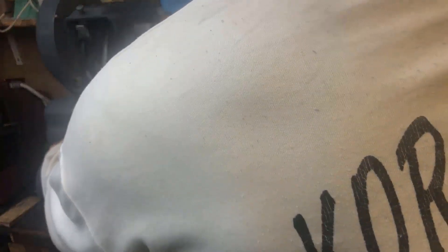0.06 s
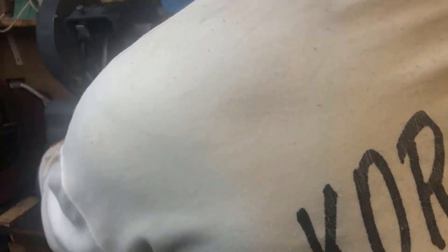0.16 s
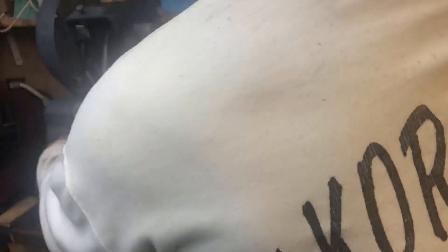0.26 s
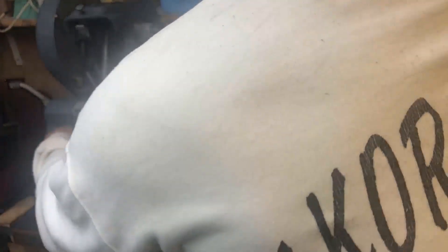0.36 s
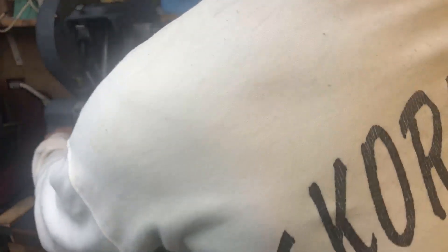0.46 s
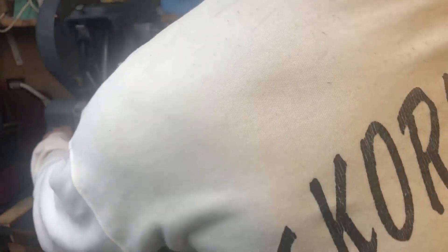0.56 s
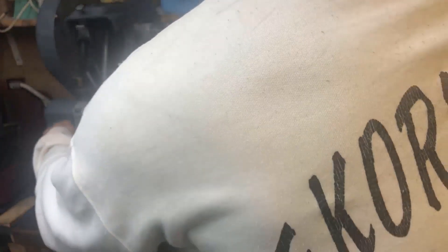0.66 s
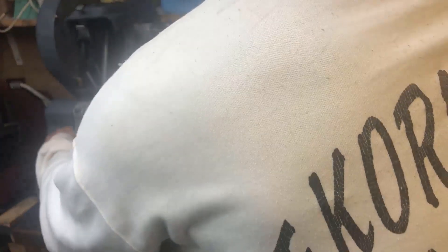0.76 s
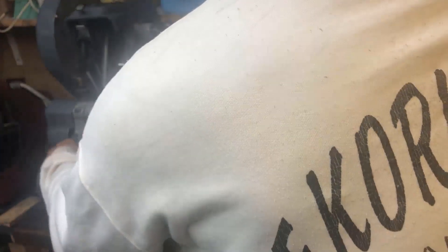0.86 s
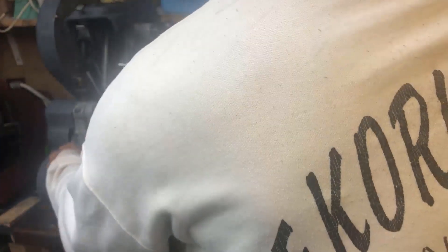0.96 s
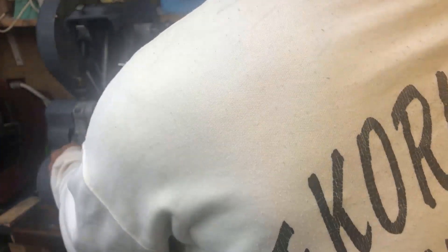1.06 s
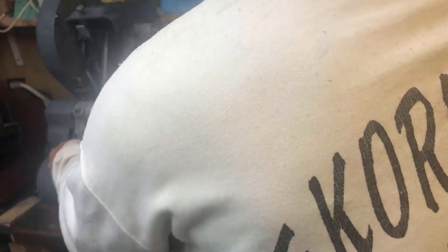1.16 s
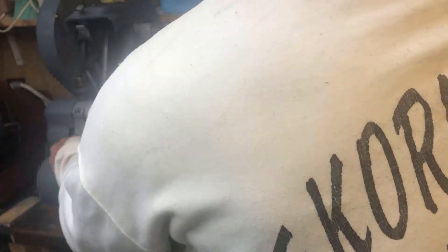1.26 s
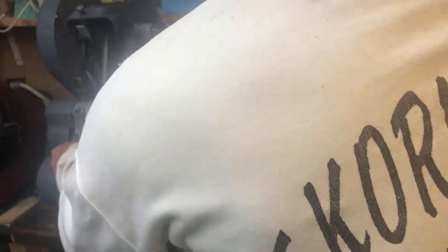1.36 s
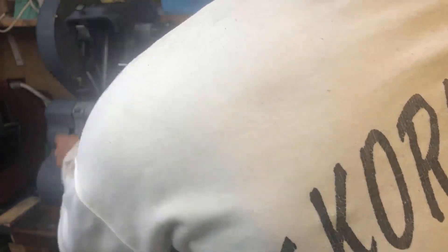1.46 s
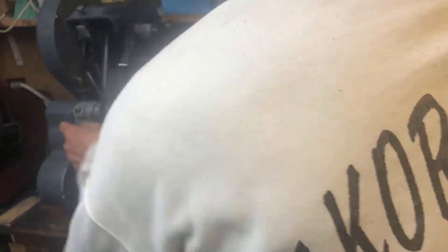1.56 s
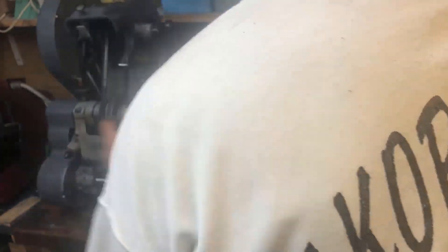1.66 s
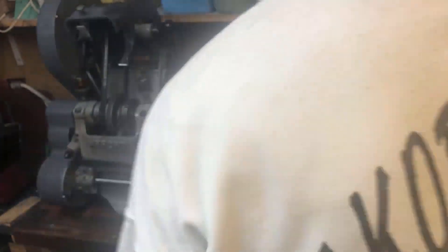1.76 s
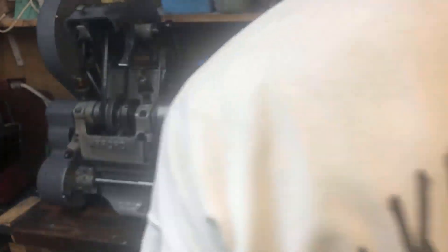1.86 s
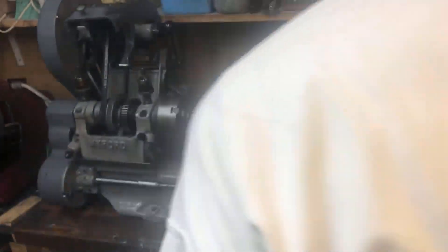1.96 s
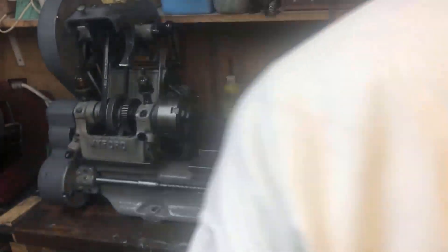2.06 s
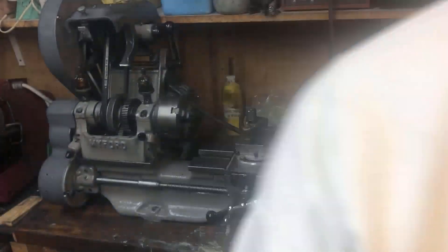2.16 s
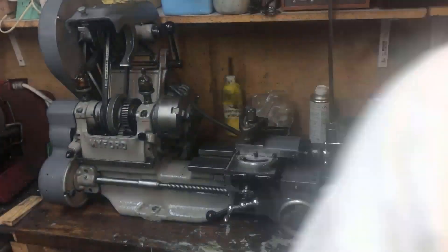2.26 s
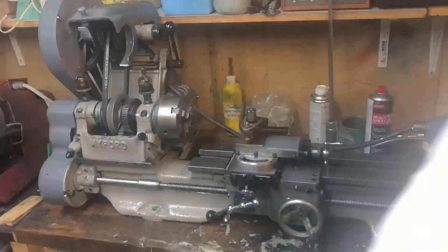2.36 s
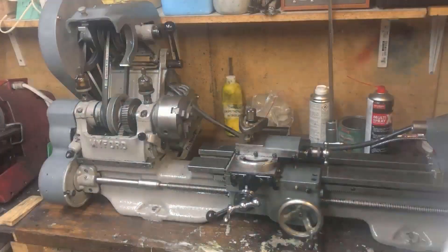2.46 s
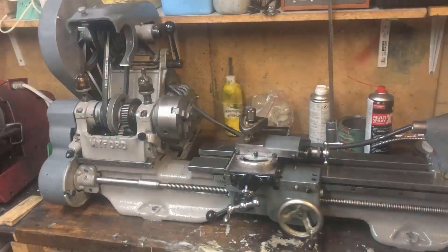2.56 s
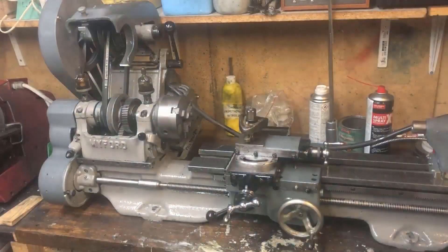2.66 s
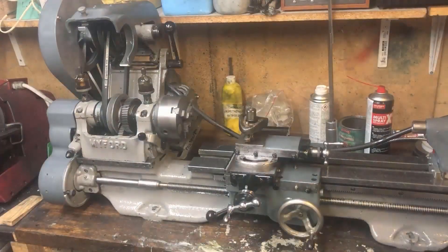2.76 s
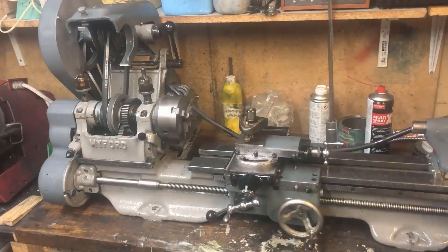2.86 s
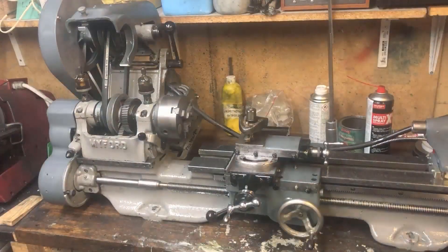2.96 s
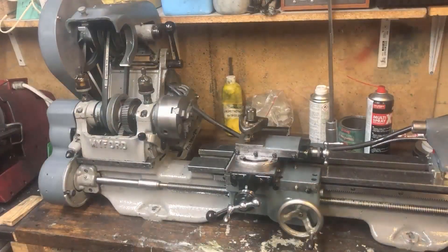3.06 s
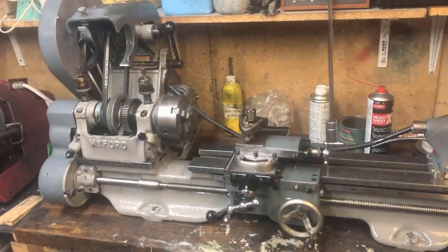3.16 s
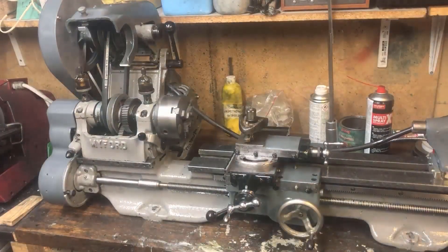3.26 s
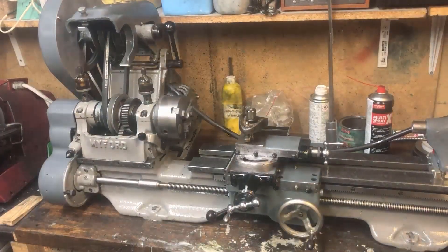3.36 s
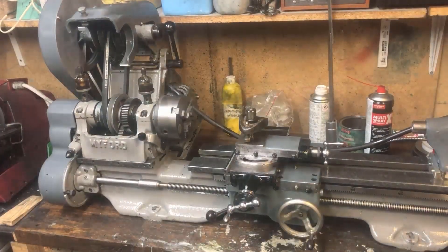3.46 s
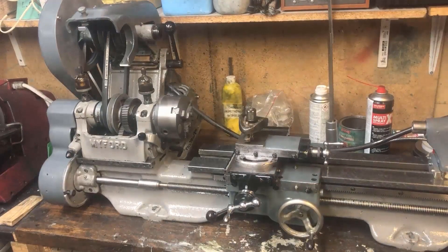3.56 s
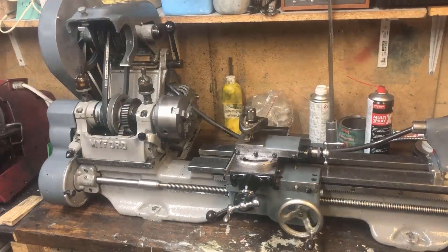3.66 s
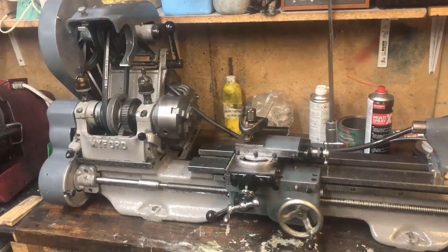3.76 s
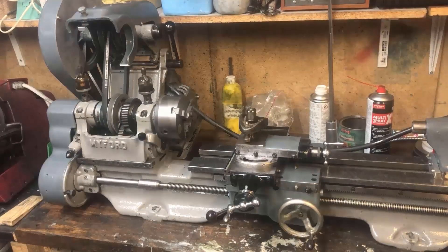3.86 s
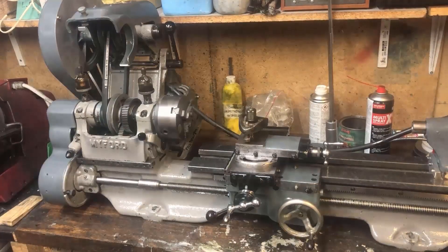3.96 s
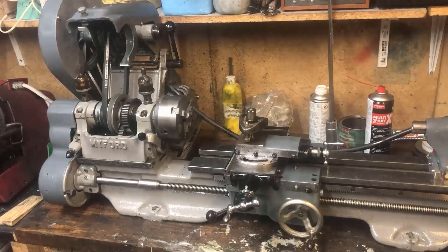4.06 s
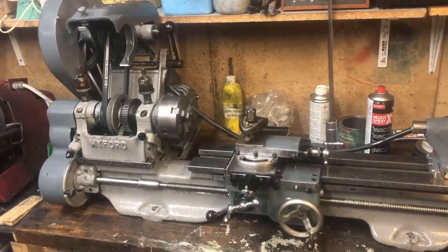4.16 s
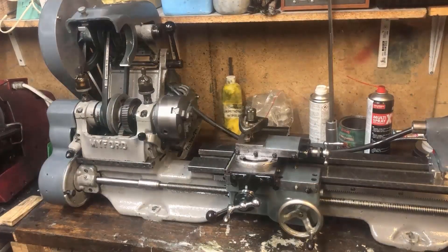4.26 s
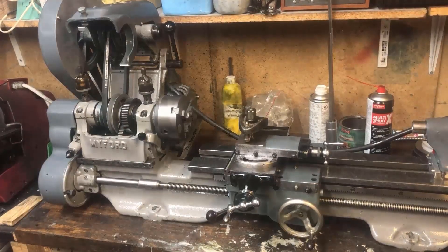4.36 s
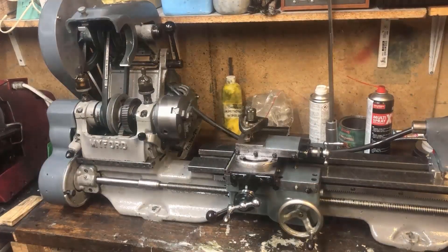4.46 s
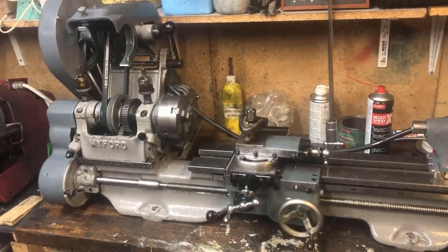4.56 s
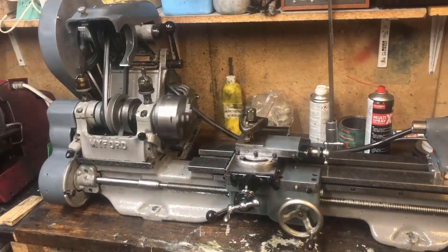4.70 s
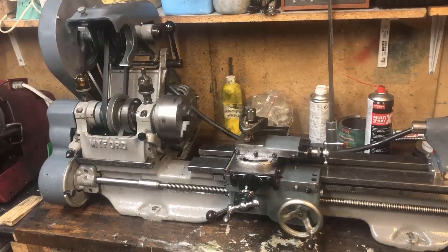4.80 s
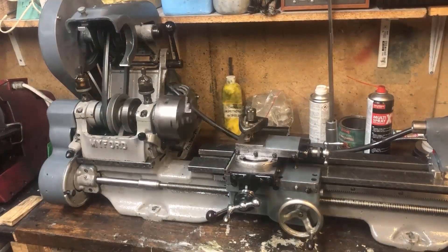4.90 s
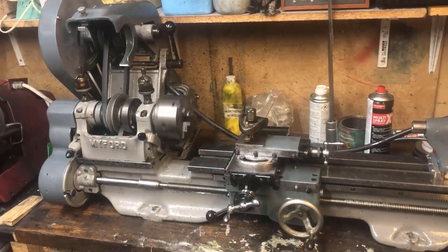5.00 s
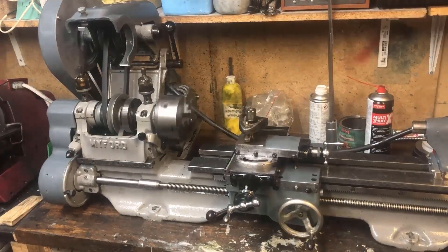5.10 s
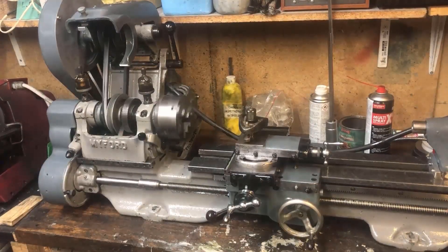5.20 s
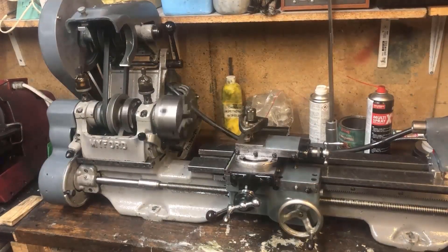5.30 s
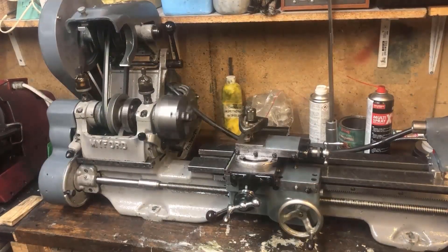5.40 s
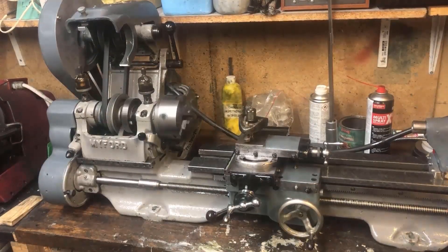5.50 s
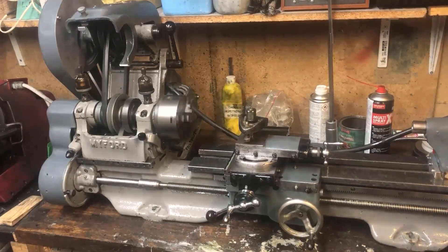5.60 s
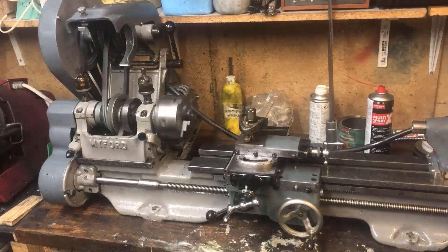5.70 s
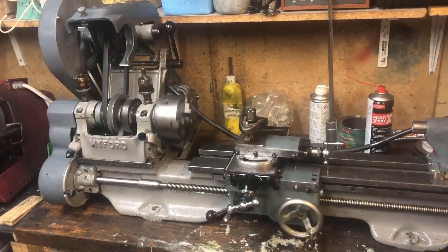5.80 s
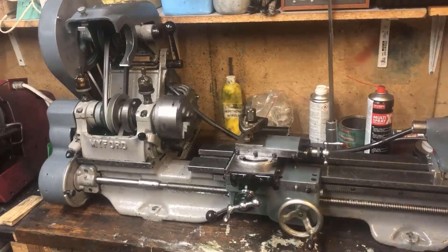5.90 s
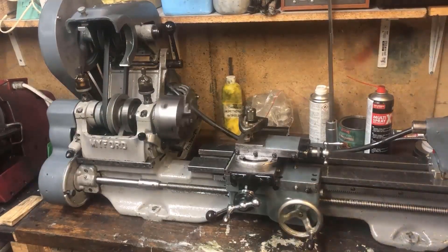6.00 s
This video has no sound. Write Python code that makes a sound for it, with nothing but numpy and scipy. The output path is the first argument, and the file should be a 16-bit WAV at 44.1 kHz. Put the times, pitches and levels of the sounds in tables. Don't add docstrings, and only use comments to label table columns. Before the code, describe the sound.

Quiet handling comes first: dull heel thumps, sharp lever clicks, small metal pings, rustling clothing and soft scuffs. After a modest clunk and a lull, heavier wooden knocks shake the bench and a lathe motor kicks in. Its gears chatter brightly, with regular hard clacks, low rumble and thin bearing hiss. Close phone pickup, short woody room, little deep bass.

```python
import sys
import numpy as np
from scipy import signal
from scipy.fft import rfft, irfft
from scipy.io import wavfile
from scipy.ndimage import uniform_filter1d

SR = 44100
rng = np.random.default_rng(int(sys.argv[2]) if len(sys.argv) > 2 else 0)


def gain_from_db(level_db):
    decades = np.asarray(level_db, float) / 20
    return 10 ** decades


def generate_wav(sig):
    pcm = np.round(np.clip(np.atleast_2d(sig).T, -1, 1) * 32767).astype(np.int16)
    wavfile.write(sys.argv[1], SR, pcm)


N = 266364

# frequency in Hz, level in dB.
MAINS_HUM = [(100, -71.5), (200, -70.5)]
# frequency in Hz, density in dB per Hz.
AIR_COLOUR = [(20, -31), (45, -8.5), (90, 2.5), (160, -6), (300, -3.5), (550, -11.5), (1200, -16),
              (4000, -20), (10000, -22.5), (15800, -24)]
# time in seconds, amount in dB.
MOVEMENT = [(0, -1), (.17, -4), (.5, -11), (.74, -12), (1.5, -10), (1.77, -6.5), (2.17, -3), (2.42, -5),
            (2.96, -4), (3.3, -8.5), (3.7, -11), (4.1, -9.5)]
# level at full movement in dB, slope in dB per dB of movement.
STIR_LAYERS = [
    (-60, .2),
    (-57, 1.01),
    (-58.5, 1.22),
]
CREAK_DB, CREAK_RISE_S, CREAK_T60_S = -29.5, 0.046, 0.55

# start in seconds, length in seconds, level in dB, centre in Hz.
KNELLS = [
    (1.597, 0.049, -49.5, 432),
    (0, 0.28, -69.5, 9600),
    (.25, 0.28, -71.5, 9300),
    (1.651, .05, -67, 4950),
    (2.245, 0.042, -64, 4540),
    (2.814, 0.059, -46, 1450),
    (3.37, 0.063, -70, 3000),
    (4.371, 0.067, -43, 421),
    (4.6, 0.045, -40, 440),
    (4.774, 0.1, -35, 71.4),
]
# start in seconds, length in seconds, level in dB, centre in Hz.
PINGS = [(0.351, 0.072, -70, 955), (1.087, 0.038, -59.5, 1650), (1.144, 0.025, -58, 1600),
         (1.465, 0.04, -59.5, 1560), (1.733, 0.037, -67, 5600), (3.729, 0.067, -66, 3150),
         (.96, 0.09, -53.5, 995), (1.31, 0.085, -52, 990), (2.375, .04, -58, 3000),
         (2.82, 0.037, -51, 1850), (4.196, 0.045, -65, 3240), (4.297, 0.14, -60.5, 3000),
         (4.3, 0.14, -49.5, 883), (4.131, 0.016, -30.5, 905), (4.585, 0.014, -30, 3060),
         (4.743, 0.049, -29, 5760), (4.791, 0.033, -28.5, 702), (.953, 0.062, -46.5, 2900)]
# start in seconds, length in seconds, level in dB, centre in Hz.
SWISHES = [(0.539, 0.032, -63, 8540), (1.757, 0.0052, -64, 2500), (1.96, 0.0044, -59, 1800),
           (1.972, 0.0061, -51.5, 1270), (3.2, 0.12, -75, 6000), (2.004, 0.21, -64.5, 4940),
           (2.05, 0.13, -66, 1500), (2.0, 0.23, -68, 11000), (2.37, 0.045, -60, 11000),
           (1.305, 0.047, -55, 11000), (2.467, 0.26, -66.5, 2000), (2.503, .12, -63.5, 600),
           (2.818, 0.067, -54, 11900), (3.715, 0.11, -67.5, 9000), (3.994, 0.065, -67.5, 9150),
           (4.331, 0.094, -53.5, 1450), (4.35, 0.051, -56, 3900), (4.415, 0.031, -44, 493),
           (4.697, 0.091, -42.5, 486), (4.75, 0.0046, -24, 2460), (5.31, 0.019, -40, 9800)]
# start in seconds, length in seconds, level
# in dB, centre in Hz.
BOOMS = [
    (3.11, 0.11, -52, 125),
    (3.481, 0.061, -56, 140),
    (4.136, 0.02, -31, 380),
    (4.15, 0.06, -38, 182),
    (4.22, 0.081, -39.5, 130),
    (4.379, 0.015, -30.5, 307),
    (4.396, 0.13, -37.5, 121),
    (4.589, 0.02, -22, 398),
    (4.989, 0.04, -33.5, 287),
]
PING_WIDTH, KNELL_WIDTH, BOOM_WIDTH, SWISH_WIDTH = 0.14, 0.29, 0.77, 1.26

# time in seconds, peak in dB, thud in dB re peak, ring in Hz.
THUMPS = [
    (0.049, -24.5, 8.5, 775),
    (0.815, -41, -12, 1070),
    (1.151, -54, 11.5, 1640),
    (1.403, -44, 3, 1020),
    (1.756, -52, -9, 1560),
    (2.232, -48, -4, 714),
    (2.633, -46, -20, 1980),
    (2.818, -29, -27, 1190),
]
THUMP_CRACK_DB, THUMP_T60_S = -13.5, 0.14
# time in seconds, peak in dB, thud in dB re peak, ring in Hz.
LEVERS = [(0.105, -25.5, 3, 1750), (0.139, -31.5, 9.5, 1510), (0.442, -37, 6, 1130),
          (0.539, -56, -12, 2500), (0.714, -35.5, -9, 1880), (0.832, -36, 0, 1280),
          (0.955, -25.5, 0.5, 2730), (1.089, -48, 9.5, 940), (1.303, -23.5, 6, 1870), (1.48, -50, 4, 1620),
          (1.601, -42.5, 10.5, 705), (1.67, -49, 3, 4580), (1.734, -50, -4, 5500), (2.259, -56, -9, 1500),
          (2.371, -35.5, -8, 1930), (2.842, -32.5, -13, 1220), (2.95, -48, -11, 1970),
          (3.467, -41.5, -7, 1010), (3.725, -45, 2, 900), (4.019, -59.5, 11, 3120)]
LEVER_CRACK_DB, LEVER_T60_S = 0, .15
# time in seconds, peak in dB, thud in dB re peak, ring in Hz.
SCUFFS = [
    (0.361, -58, 11, 950),
    (0.403, -44.5, 11, 750),
    (0.674, -44, -18, 940),
    (1.284, -49, 0, 970),
    (3.363, -53.5, 5.5, 982),
    (3.391, -53, -10, 3290),
    (3.75, -57, 11.5, 3080),
]
SCUFF_CRACK_DB, SCUFF_T60_S = 3.5, 0.32
FIRST_TOUCH_DB, FIRST_TOUCH_S = 1.5, 0.0013
SHADED_UNTIL_S, SHADE_HZ = .9, 6500

# time in seconds, peak in dB, thud in dB re peak, crack in dB
# re peak, decay T60 in seconds.
JOLTS = [(3.103, -28.5, 3, -16, 0.11), (3.489, -55.5, 12.5, 9, 0.17), (4.136, -25, 14, -32, 0.13),
         (4.226, -56.5, 21, -19, 0.98), (4.293, -46, -16, -1, 0.41), (4.381, -40.5, 17.5, -30, 0.12),
         (4.59, -12.5, 6, -0.5, 0.13), (4.604, -17.5, 7, 6.5, 0.11), (4.637, -47, 26, -18, 0.15),
         (4.724, -14, -0.5, 0, 0.22), (4.753, -7.5, -3, 3, 0.13), (4.808, -23.5, -19, 1, 0.28),
         (4.995, -16, 0, 6, 0.11)]
SWITCH_BOX_HZ = 867
# frequency in Hz, level in dB, decay T60 in seconds.
BENCH_MODES = [(79, -32, 0.26), (126, -10.5, 0.14), (153.5, 7, 0.3), (270, 11.5, 0.054), (333, 9, 0.068),
               (408, 5.5, 0.45), (556, -37, 0.18), (700, -21, .1)]

# time in seconds, peak in dB, treble ring in dB re peak, wheel that rings most in Hz.
CLACKS = [
    (4.8724, -9.5, -2, 5270),
    (5.041, -1, 1.5, 4100),
    (5.2118, -4.5, -2, 7500),
    (5.395, -13.5, 10.5, 4220),
    (5.5628, -3, 5.5, 6400),
    (5.734, -7.5, 0, 5420),
    (5.9124, -5, 3, 4230),
]
# time in seconds, peak in dB, treble ring in dB re peak.
TOOTH_KNOCKS = [(4.81, -15, 9.5), (4.853, -6.5, -10), (4.9136, -17, -25), (4.9494, -22, -32),
                (5.1594, -23, 10), (5.315, -12, -4), (5.364, -12.5, 7), (5.4583, -23, 8),
                (5.6274, -12.5, 5), (5.6686, -23, 0), (5.7975, -25, -20), (5.862, -18.5, 13.5)]
LOADED_WHEEL_HZ, FREE_WHEEL_HZ, RUN_IN_S = 5420, 4225, 5.2
# frequency in Hz, width in Hz, level in dB.
GEAR_MODES = [(958, 55, -2.5), (1125, 40, -5), (1500, 30, -4), (1750, 30, -4), (2215, 56, -4),
              (2600, 30, -2.5), (2980, 33, -6), (3280, 39, -9), (4225, 70, -8), (4990, 69, -15),
              (5420, 45, -6.5), (6030, 73, -11), (6600, 150, -28), (7510, 90, -13.5), (9900, 200, -33),
              (10300, 150, -32), (11500, 150, -33)]
# frequency in Hz, density in dB per Hz.
CASING_COLOUR = [(88, -6), (150, -19), (378, -5), (954, -1.5), (1400, -3.5), (4120, -5.5), (4720, -17),
                 (5510, -12.5), (6430, -23.5), (7500, -20.5), (15000, -66)]
# frequency in Hz, level in dB.
MESH_TONES = [(242, -48.5), (544, -47.5), (637, -48), (947, -54), (2600, -46)]
START_S = 4.7
RATTLE_DB, RUMBLE_DB, HISS_DB = -23, -40.5, -50.5
FULL_SPEED_S, SPIN_UP_DB_PER_S = 4.81, 228
SURGE_S, SURGE_DB, SURGE_RISE_DB_PER_S, SURGE_FALL_DB_PER_S = 4.76, -22.5, 148, 205
HISS_SETTLES_S, HISS_RISE_DB_PER_S = 5.22, 42
MESH_PER_S, MESH_DEPTH_DB = 62, 2.5
ON = int(START_S * SR)
RUN = N - ON

ROOM_T60_S, ROOM_DB = 0.1, -11
TOP_HZ = 15780


def level(x, db=0):
    return x * gain_from_db(db) / np.sqrt(np.mean(x ** 2))


def band(x, lo_hz, hi_hz, order=2):
    edges = [lo_hz, min(hi_hz, .45 * SR)]
    return signal.sosfilt(signal.butter(order, edges, "bandpass", fs=SR, output="sos"), x)


def ring(x, hz, width_hz):
    r = np.exp(-np.pi * width_hz / SR)
    return (1 - r) * signal.lfilter([1, 0, -1], [1, -2 * r * np.cos(2 * np.pi * hz / SR), r * r], x)


def colour(x, points):
    hz, db = np.transpose(points)
    log_hz = np.log(np.arange(N // 2 + 1) * SR / N + 1)
    return irfft(rfft(x) * gain_from_db(np.interp(log_hz, np.log(hz), db)), N)


def walk(rate):
    hold = int(SR / rate)
    steps = np.repeat(rng.standard_normal(N // hold + 1), hold)
    return level(uniform_filter1d(uniform_filter1d(steps, hold), hold)[:N])


def grit(per_s, spread_db, size):
    size_db = np.minimum(spread_db * rng.exponential(size=size), 7)
    struck = rng.random(size) < per_s / SR
    return level(struck * rng.standard_normal(size) * gain_from_db(size_db))


def peak(at_s, db, rise_db_per_s, fall_db_per_s):
    t = np.arange(N) / SR - at_s
    return gain_from_db(db + np.where(t < 0, rise_db_per_s, -fall_db_per_s) * t)


def mains_hum():
    t = np.arange(N) / SR
    return sum(gain_from_db(db + 7.0 + 2.2 * walk(8.08)) * np.sin(2 * np.pi * hz * t) for hz, db in MAINS_HUM)


def stirring():
    moving_db = np.interp(np.arange(N) / SR, *np.transpose(MOVEMENT))
    boards, cloth, hiss = (gain_from_db(db + slope * moving_db) for db, slope in STIR_LAYERS)
    creak = sum(peak(s + CREAK_RISE_S, db + thud_db + CREAK_DB, 20 / CREAK_RISE_S, 60 / CREAK_T60_S)
                for s, db, thud_db, hz in LEVERS + THUMPS if db + thud_db > -30)
    out = np.zeros(N)
    for gain, lo_hz, hi_hz in [(boards, 30, 600), (creak, 130, 700), (cloth, 600, 5000), (hiss, 5000, 17000)]:
        waver = gain_from_db((2.6 if lo_hz < 500 else 1.3) * walk(20))
        air = colour(rng.standard_normal(N), AIR_COLOUR)
        out += gain * waver * level(band(air, lo_hz, hi_hz))
    return out


def rubs():
    out = np.zeros(N)
    for rows, share in [(KNELLS, KNELL_WIDTH), (PINGS, PING_WIDTH), (SWISHES, SWISH_WIDTH), (BOOMS, BOOM_WIDTH)]:
        for s, length, db, hz in rows:
            noise = rng.standard_normal(SR // 4)[:int(length * SR)]
            u = np.arange(len(noise)) / len(noise)
            swell = np.sin(np.pi * u ** 0.53) * noise
            width_hz = 0.85 * share * hz
            shaped = ring(ring(np.pad(swell, (0, 2000)), hz, width_hz), hz, width_hz)
            at = int(s * SR)
            out[at:at + len(shaped)] += shaped * gain_from_db(db) / np.sqrt(np.sum(shaped ** 2) / len(u))
    return out


def blows(table, thud_modes, ring_db, lead_s, rise_s, thud_rise_s, thud_stays, crack_stays):
    out, t = np.zeros(N + SR), np.arange(SR // 2) / SR

    def fade(t60, stay, rise):
        return np.exp(-np.log(1000) * t / (stay * max(t60, .02))) * (1 - np.exp(-t / rise))

    for s, db, thud_db, crack_db, hz, t60 in table:
        noise = rng.standard_normal((4, len(t)))
        first_touch = gain_from_db(FIRST_TOUCH_DB) * np.exp(-abs(t - lead_s) / FIRST_TOUCH_S)
        chatter = gain_from_db(2.1 * level(band(noise[3], 30, 260))) + first_touch
        body = level(band(noise[0], hz / 1.8, hz * 1.7)) + gain_from_db(ring_db) * level(ring(noise[0], hz, hz / 12))
        crack = gain_from_db(crack_db) * level(band(noise[1], 2070, 5280, order=1))
        thud = gain_from_db(thud_db) * level(thud_modes(noise[2]))
        blow = chatter * body * fade(t60, 0.98, rise_s)
        blow += chatter * crack * fade(t60, crack_stays, rise_s)
        blow += thud * fade(t60, thud_stays, thud_rise_s)
        at = int((s - lead_s) * SR)
        out[at:at + len(t)] += gain_from_db(db - 10.5) * blow
    return out[:N]


def hands_and_feet():
    def floor(x):
        return level(band(x, 235, 590)) + gain_from_db(-28.0) * level(band(x, 75, 130))

    kinds = [(THUMPS, THUMP_CRACK_DB, THUMP_T60_S), (LEVERS, LEVER_CRACK_DB, LEVER_T60_S),
             (SCUFFS, SCUFF_CRACK_DB, SCUFF_T60_S)]
    knocks = [(s, db, thud_db, crack_db, hz, t60)
              for rows, crack_db, t60 in kinds for s, db, thud_db, hz in rows]
    knocked = blows(knocks, floor, ring_db=-5.0, lead_s=.003, rise_s=0.0042, thud_rise_s=0.0062,
                    thud_stays=1.16, crack_stays=1.0)
    shaded = np.arange(N) < SHADED_UNTIL_S * SR
    return np.where(shaded, band(knocked, 30, SHADE_HZ), knocked)


def switch_and_motor_jolts():
    def bench(x):
        return sum(gain_from_db(db + 1.6 * rng.standard_normal()) * level(ring(x, hz, 0.82 / t60 + 15))
                   for hz, db, t60 in BENCH_MODES)

    clunks = [(s, db, thud_db, crack_db, SWITCH_BOX_HZ, t60) for s, db, thud_db, crack_db, t60 in JOLTS]
    return blows(clunks, bench, ring_db=-2.7, lead_s=.006, rise_s=0.0086, thud_rise_s=0.0032,
                 thud_stays=1.67, crack_stays=0.84)


def motor_rumble():
    running = peak(FULL_SPEED_S, RUMBLE_DB, SPIN_UP_DB_PER_S, 0)
    surge = peak(SURGE_S, SURGE_DB, SURGE_RISE_DB_PER_S, SURGE_FALL_DB_PER_S)
    return (running + surge)[ON:] * level(band(rng.standard_normal(RUN), 55, 250))


def mesh_whine():
    t = np.arange(RUN) / SR
    return sum(gain_from_db(db + 30.0 + 2.1 * walk(12)[ON:]) * np.sin(2 * np.pi * hz * t + 0.93 * walk(6)[ON:])
               for hz, db in MESH_TONES)


def bouncing(times_s, db):
    hits = np.zeros(RUN)
    hits[(times_s * SR).astype(int) - ON] = gain_from_db(db)
    bounce = signal.lfilter([1], [1, -np.exp(-1 / (0.01 * SR))], hits)
    return uniform_filter1d(bounce, size=44, origin=21)


def wheel_rings(rattle, clack, times_s, peak_db, treble_db, wheel_hz):
    throb_phase = 2 * np.pi * MESH_PER_S * np.arange(RUN) / SR + 1.2 * walk(9)[ON:]
    shake_db = 2.6 * walk(45)[ON:] + MESH_DEPTH_DB * np.sin(throb_phase)
    total = np.sqrt(sum(gain_from_db(db) ** 2 * width for hz, width, db in GEAR_MODES))
    out = np.zeros(RUN)
    for hz, width, db in GEAR_MODES:
        width = max(width, .008 * hz)
        if hz > 3900:
            miss_db = np.minimum(40 * abs(np.log(hz / wheel_hz)), 12)
            struck = bouncing(times_s, peak_db + treble_db - miss_db)
            load_db = 3.5 * walk(35)[ON:] + shake_db
        else:
            struck = 0.68 * clack
            load_db = 2.5 * walk(35)[ON:]
        push = rattle * gain_from_db(load_db - 2.0) + struck
        teeth = grit(3000, 2.5, size=RUN)
        gain = np.sqrt(np.mean(ring(teeth, hz, width) ** 2))
        out += gain_from_db(db - 5) * np.sqrt(width) / total / gain * ring(push * teeth, hz, width)
    return out


def lathe():
    rattle = peak(FULL_SPEED_S, RATTLE_DB, SPIN_UP_DB_PER_S, 0)[ON:]
    hiss = peak(HISS_SETTLES_S, HISS_DB, HISS_RISE_DB_PER_S, 0)[ON:]
    knocks = [(s, db, treble_db, LOADED_WHEEL_HZ if s < RUN_IN_S else FREE_WHEEL_HZ)
              for s, db, treble_db in TOOTH_KNOCKS]
    times_s, peak_db, treble_db, wheel_hz = np.transpose(CLACKS + knocks)
    clack = bouncing(times_s, peak_db - 13.5)
    casing = level(colour(grit(16000, 0.93, size=N), CASING_COLOUR), -4.0)[ON:]
    patter = rattle * gain_from_db(0.7 * walk(25)[ON:] + 1.43 * walk(160)[ON:])
    bearings = level(band(grit(2500, 3.9, size=RUN), 7300, 13900))
    sound = motor_rumble() + rattle * mesh_whine()
    sound += (patter + clack) * casing
    sound += wheel_rings(rattle, clack, times_s, peak_db, treble_db, wheel_hz)
    sound += (hiss * gain_from_db(1.1 * walk(21)[ON:]) + 0.12 * clack) * bearings
    return np.pad(sound, (ON, 0))


def room(x):
    t = np.arange(SR // 2) / SR
    noise = rng.standard_normal(len(t))
    low = band(noise, 47, 3900, order=1)
    tail = low * gain_from_db(-60 * t / ROOM_T60_S) + (noise - low) * gain_from_db(-60 * t / (0.27 * ROOM_T60_S))
    tail = tail * (t > .003) / np.sqrt(np.sum(tail ** 2))
    return x + gain_from_db(ROOM_DB) * signal.fftconvolve(x, tail)[:N]


def scene():
    air = mains_hum() + stirring()
    handling = rubs() + hands_and_feet() + switch_and_motor_jolts()
    return (room(handling + gain_from_db(-4.0) * lathe()) + air)[None]


def low_pass(x):
    return signal.sosfilt(signal.butter(12, 16410, fs=SR, output="sos"), x)


def record(dry):
    thin = signal.sosfilt(signal.butter(2, 45, "highpass", fs=SR, output="sos"), dry)
    mix = signal.sosfilt(signal.ellip(10, .2, 60, TOP_HZ, fs=SR, output="sos"), thin)
    return low_pass(mix)


dry = scene()
out = record(dry)
generate_wav(out)
```